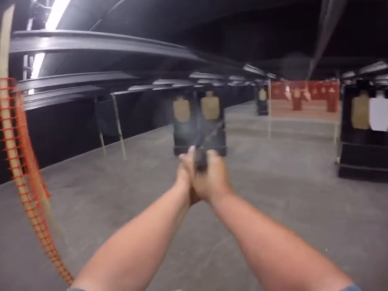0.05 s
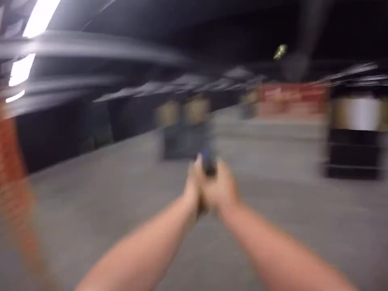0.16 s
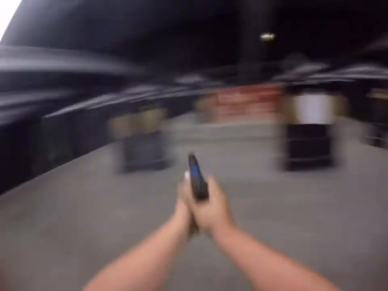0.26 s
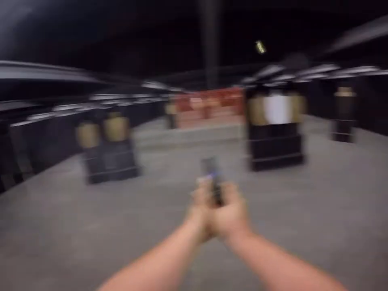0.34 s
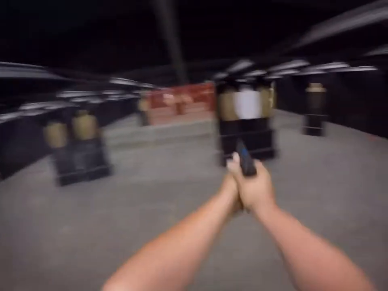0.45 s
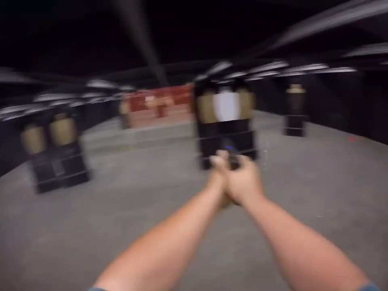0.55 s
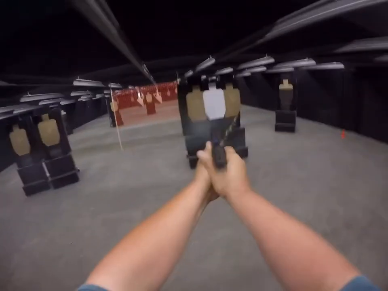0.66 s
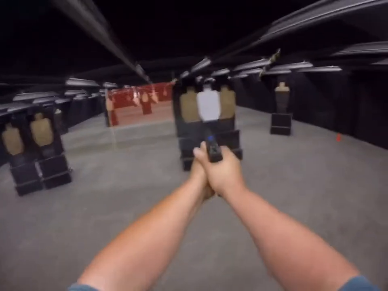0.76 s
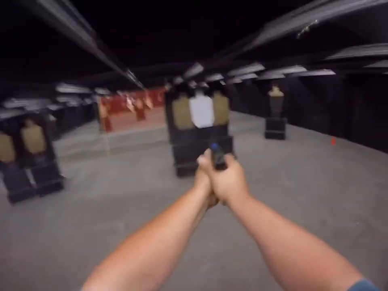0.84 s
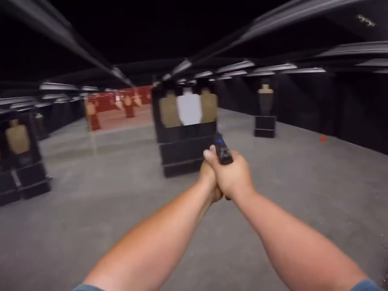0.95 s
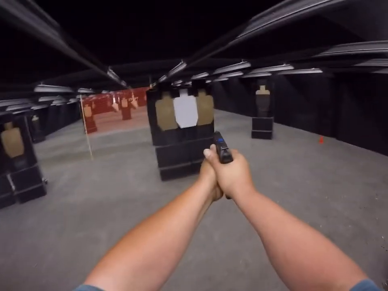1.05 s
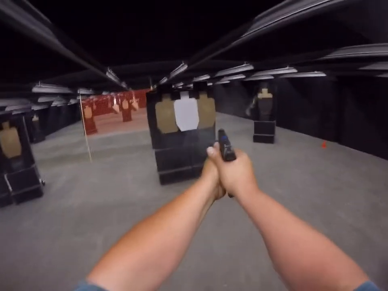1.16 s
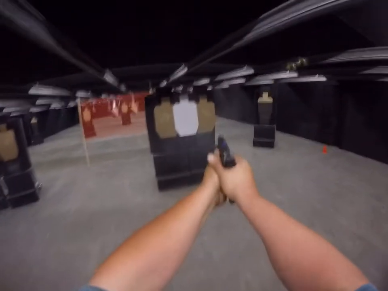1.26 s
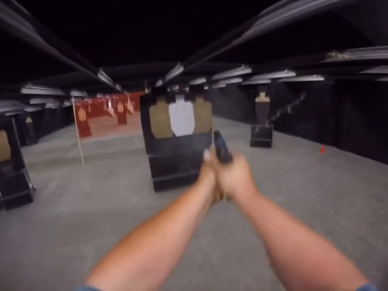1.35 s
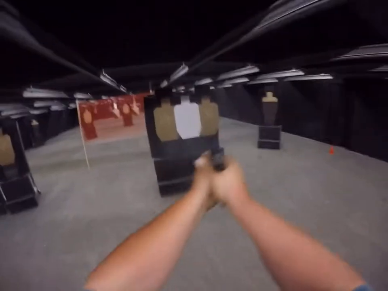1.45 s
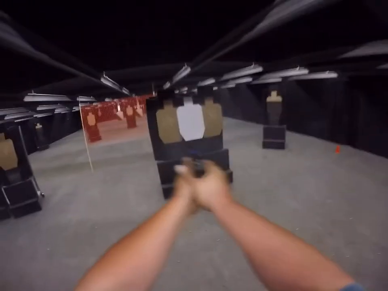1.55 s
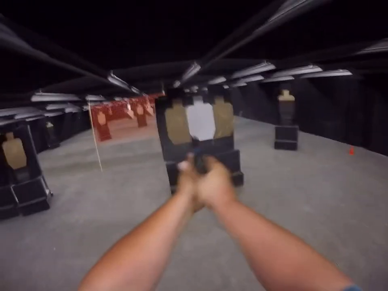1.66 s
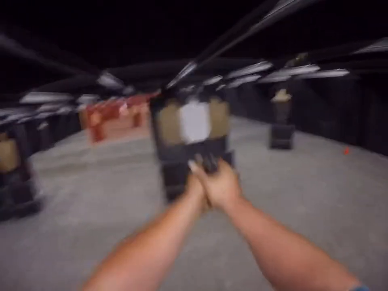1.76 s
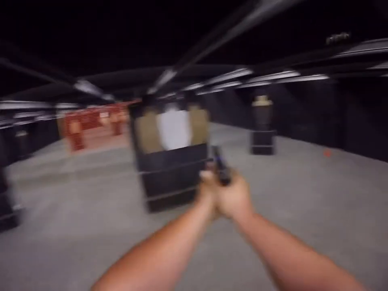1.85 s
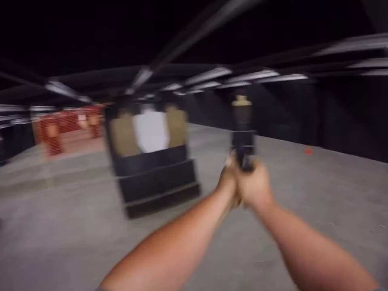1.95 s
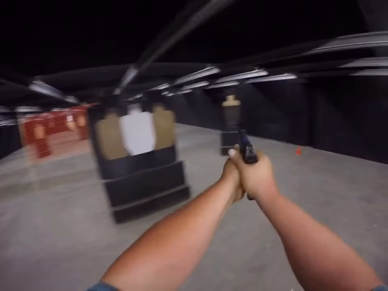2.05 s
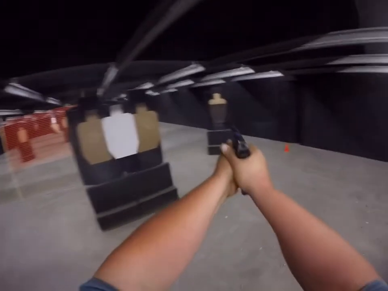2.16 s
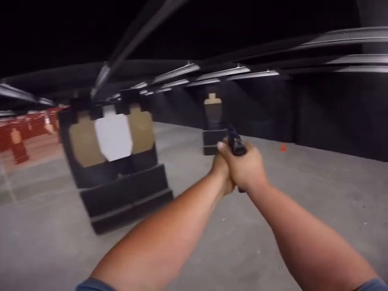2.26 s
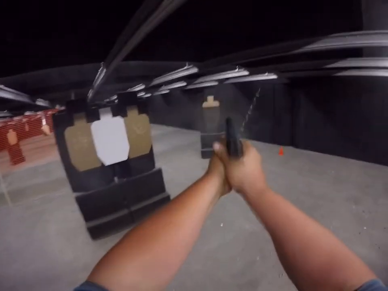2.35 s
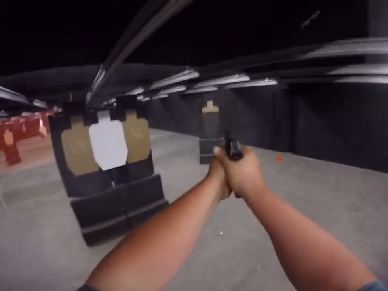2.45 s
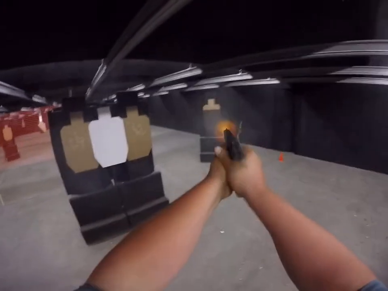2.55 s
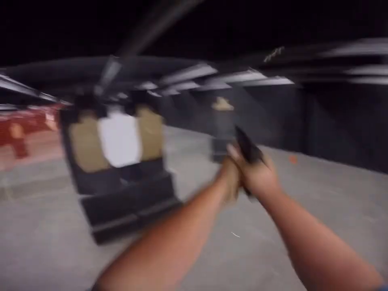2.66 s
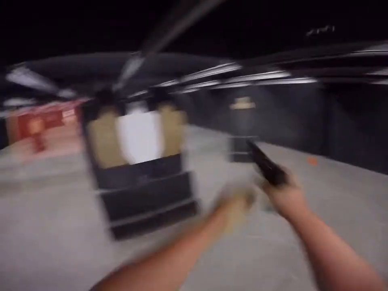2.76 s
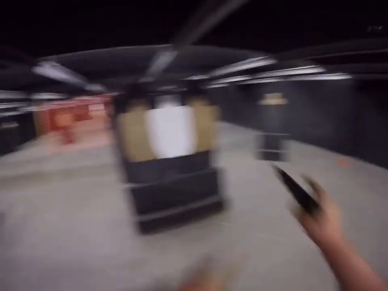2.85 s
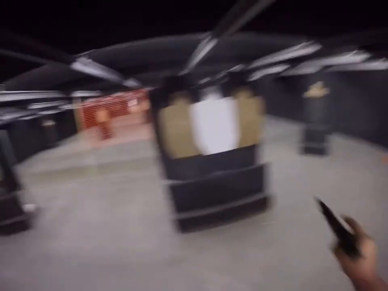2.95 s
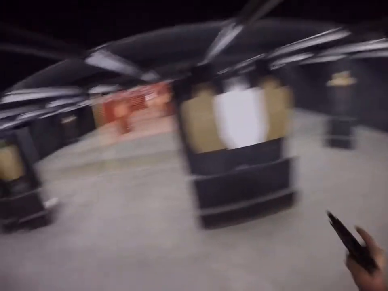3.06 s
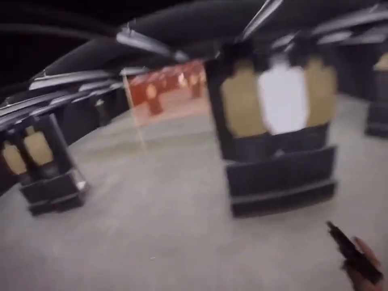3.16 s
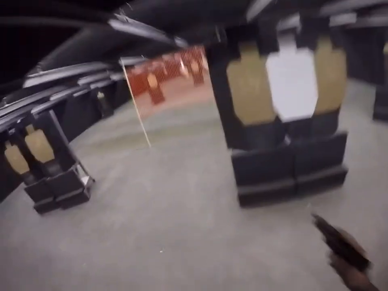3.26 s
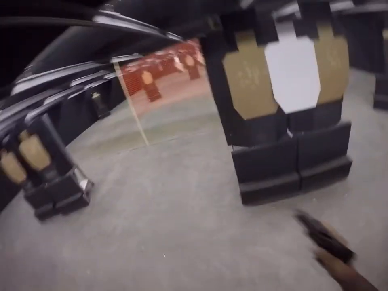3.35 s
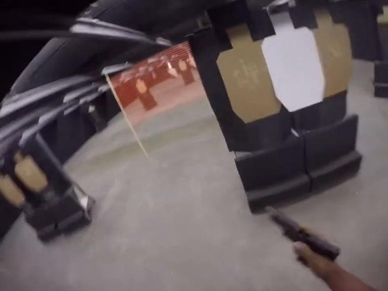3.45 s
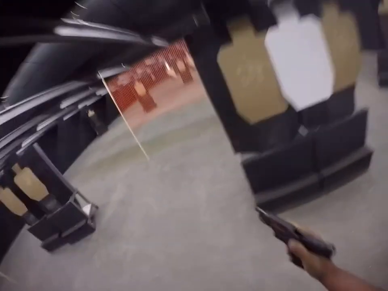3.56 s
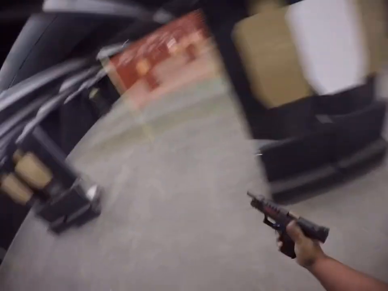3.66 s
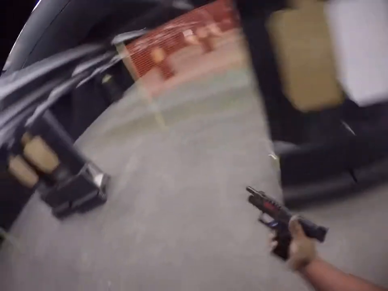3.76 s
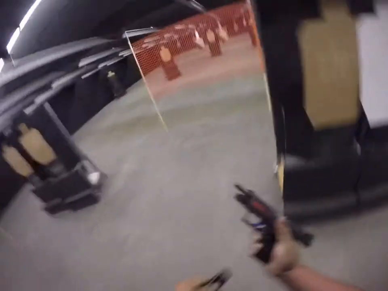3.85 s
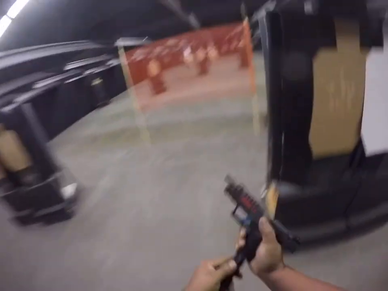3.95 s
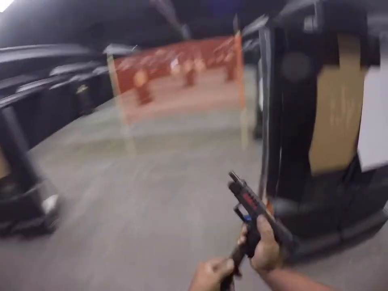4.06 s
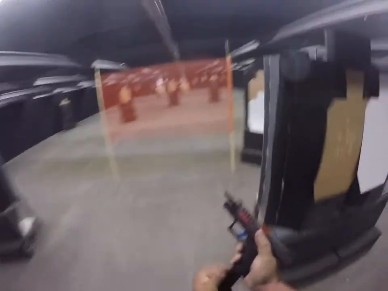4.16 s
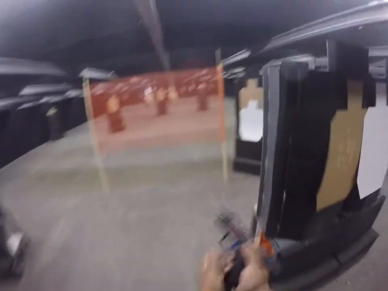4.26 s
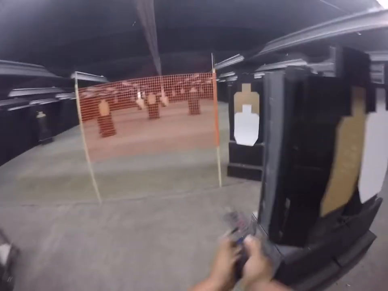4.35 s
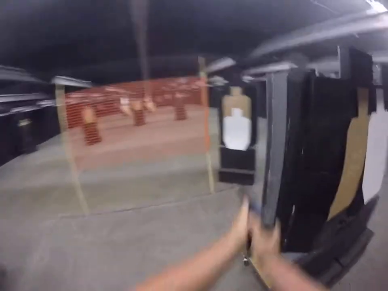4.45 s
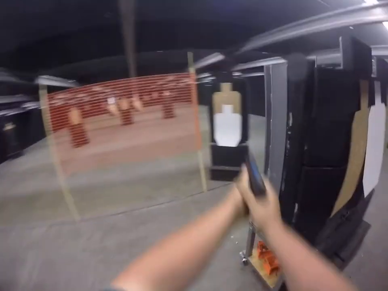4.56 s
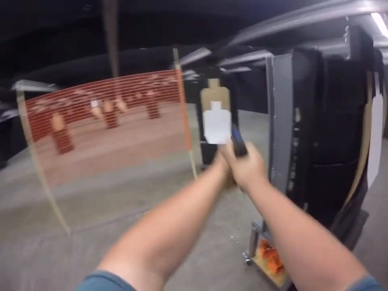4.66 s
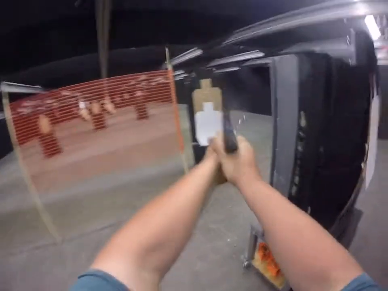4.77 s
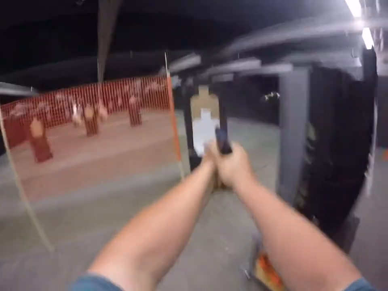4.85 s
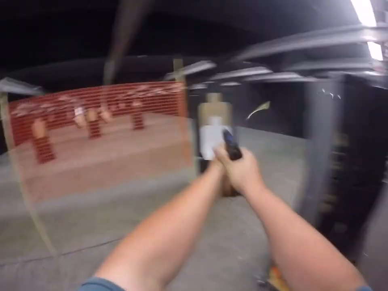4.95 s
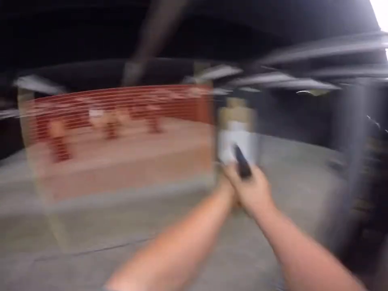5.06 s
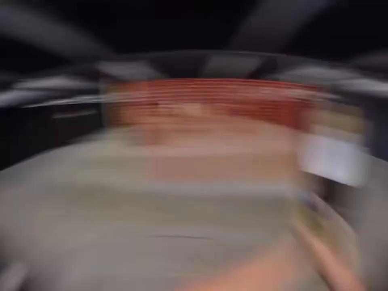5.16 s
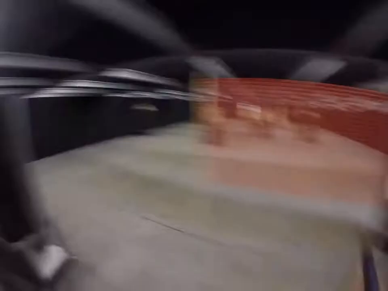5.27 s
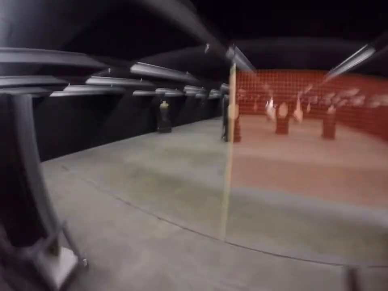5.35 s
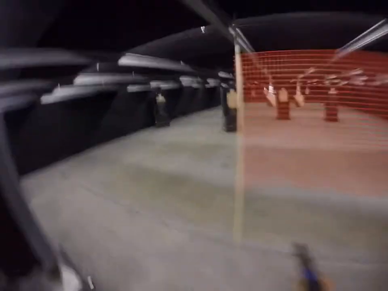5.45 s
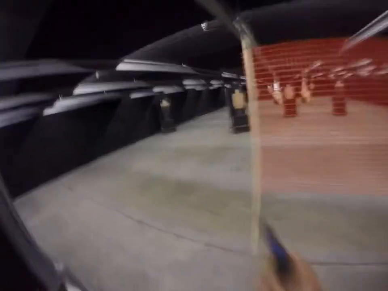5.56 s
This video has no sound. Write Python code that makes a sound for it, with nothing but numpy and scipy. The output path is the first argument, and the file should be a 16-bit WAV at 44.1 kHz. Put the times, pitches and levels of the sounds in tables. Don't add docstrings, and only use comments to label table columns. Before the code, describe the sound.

In a long, hard-walled indoor range, a handgun fires seven spaced shots, each a bright crack with a clipped boxy boom and rolling echo. Spent brass tinkles on the floor. A dropped magazine clatters, a fresh one snaps in, the slide slams, then two rapid shots follow. The sealed, head-worn microphone sounds muffled and overloaded.

```python
import sys
import numpy as np
from scipy import signal
from scipy.io import wavfile

SR = 44100
rng = np.random.default_rng(int(sys.argv[2]) if len(sys.argv) > 2 else 0)


def linear_from_db(decibels):
    return 10 ** (np.asarray(decibels, float) / 20)


def generate_wav(signal):
    frames = np.transpose(np.atleast_2d(signal))
    scaled = np.clip(frames, -1, 1) * 32767
    pcm = np.round(scaled).astype(np.int16)
    wavfile.write(sys.argv[1], SR, pcm)


N = 247401

# start [s], crack peak [dB], tail level [dB], tail length factor (shorter beside a barrier).
SHOTS = [
    (0.0756, 0.5, -9, 1.174),
    (0.7005, 0.5, -9.5, 1.18),
    (1.15, 4.5, -10.5, 1.1),
    (1.3365, -1.5, -10.5, 1.04),
    (1.6843, 2, -10, 1.193),
    (2.3551, 2, -8.5, 0.95),
    (2.593, 2.5, -11.5, 1.122),
    (4.7791, 7, -10, 1.106),
    (4.9426, 3.5, -13, 0.76),
]
# frequency [Hz], width [Hz], level [dB].
CASE_TREBLE = [(2770, 710, 3.5), (3840, 830, 2), (4960, 870, -2.5), (6660, 2300, -7.5), (10500, 10000, -11),
               (13500, 8900, -14)]


def rms_one(x):
    return x / np.sqrt(np.mean(x ** 2) + 1e-20)


def at_hz(points, hz):
    table_hz, values = np.transpose(points)
    return np.interp(np.log(hz), np.log(table_hz), values)


def band(x, low_hz, high_hz, order=2):
    sos = signal.butter(order, [low_hz, min(high_hz, .45 * SR)], "band", fs=SR, output="sos")
    return signal.sosfilt(sos, x + 1e-18)


def resonate(x, peaks):
    out = 0
    for k, (hz, width_hz, level_db) in enumerate(peaks):
        r = np.exp(-np.pi * width_hz / SR)
        poles = [1, -2 * r * np.cos(2 * np.pi * hz / SR), r * r]
        zeros = (1 - r * r) / 2 * np.array([1, 0, -1])
        out = out + (-1) ** k * linear_from_db(level_db) * signal.lfilter(zeros, poles, x + 1e-18)
    return out


def add(out, start_s, piece):
    i = max(round(start_s * SR), 0)
    out[i:i + len(piece)] += piece[:N - i]


def burst(t60_s, rise_s, grain_db):
    t = np.arange(int(.12 * SR)) / SR
    roughness = np.clip(rng.standard_normal(len(t)), -3, 1.6)
    grains = rng.standard_normal(len(t)) * linear_from_db(grain_db * roughness)
    x = grains * (1 - np.exp(-t / rise_s)) * linear_from_db(-60 * t / max(t60_s, .002))
    return x / np.abs(x).max()


def slow(rate_hz):
    r = np.exp(-2 * np.pi * rate_hz / SR)
    return rms_one(signal.lfilter([1], [1, -2 * r, r * r], rng.standard_normal(N + SR))[SR:])


def moving():
    # time [s], level [dB].
    stride_rows = [(3.2, -58.5), (3.39, -49.5), (3.45, -56), (3.7, -53), (3.9, -47), (4.05, -38.5),
                   (4.11, -44), (4.35, -39.5), (4.42, -44.5), (4.52, -37.5), (4.74, -39), (5.38, -50),
                   (5.43, -53), (5.5, -41), (5.6, -45.5)]
    # time [s], level [dB].
    hands_rows = [
        (3.41, -76.5),
        (3.52, -60),
        (3.659, -69.5),
        (3.8, -61),
        (4.02, -72),
        (4.14, -68),
        (4.28, -60),
        (4.4, -47),
        (4.76, -67),
        (5.3, -77),
    ]
    t = np.arange(N) / SR
    stride_db = np.interp(t, *np.transpose(stride_rows))
    hands_db = np.interp(t, *np.transpose(hands_rows))
    rustle_db = -58.5 + 0.69 * (stride_db + 49)

    lumps = rms_one(band(rng.standard_normal(N), 28, 86) * linear_from_db(2.7 * slow(10)))
    dull = band(band(rng.standard_normal(N), 110, 480, order=3), 60, 540, order=3)
    rubbing = rms_one(dull * linear_from_db(1.5 * slow(15)))
    grains = rng.standard_normal(N) * linear_from_db(4.3 * rng.standard_normal(N) + 3 * slow(35))
    fibres = rms_one(band(resonate(grains, CASE_TREBLE[:4]), 2000, 6900))
    return linear_from_db(stride_db) * lumps + linear_from_db(rustle_db) * rubbing + linear_from_db(hands_db) * fibres


def contact_rows():
    # bright edge [dB], body knock [dB], rattle t60 [s], hall level [dB].
    drop = [
        (3.3904, -24),
        (3.863, -39),
        (3.871, -36.5),
        (3.932, -44),
        (3.975, -45),
        (4.008, -57),
    ]
    drop_sound = (-11, -41, 0.2, -10.5)
    thud = [
        (3.698, -31),
        (4.1131, -35.5),
    ]
    thud_sound = (-15, -15, 0.13, -12)
    fumble = [(4.037, -45.5), (4.0445, -31.5), (4.0721, -38.5), (4.0855, -35), (4.156, -41), (4.165, -41),
              (4.1764, -33.5), (4.1864, -40), (4.198, -47), (4.232, -49.5), (4.306, -28)]
    fumble_sound = (-20.5, -21, 0.06, -29)
    trigger = [
        (2.317, -33.5),
        (2.335, -47),
    ]
    trigger_sound = (-38, -26.5, 0.1, -32.5)
    seat = [
        (4.3257, 0.5),
        (4.33, -17.5),
        (4.3335, -16),
    ]
    seat_sound = (-16, -29.5, 0.02, -29)
    slide = [
        (4.1174, -35.5),
        (4.399, -27),
        (4.410, -22),
        (4.418, -17.5),
        (4.4245, -12),
        (4.4268, -2),
        (4.432, -10.5),
    ]
    slide_sound = (-5.5, -22, 0.05, -26)
    gear = [
        (2.2149, -50),
        (3.309, -52),
        (4.2592, -40),
        (4.2734, -42),
        (4.748, -57.5),
        (5.5932, -43.5),
    ]
    gear_sound = (-9, -16, -1.9, -13)
    kinds = [(drop, drop_sound), (thud, thud_sound), (fumble, fumble_sound), (trigger, trigger_sound),
             (seat, seat_sound), (slide, slide_sound), (gear, gear_sound)]
    return [(*row, *sound) for rows, sound in kinds for row in rows]


def hall():
    # frequency [Hz], level [dB per Hz].
    tail_spectrum = [(20, -29.5), (45, -23.5), (80, -13), (155, -12), (250, -0.5), (410, 1), (560, -11),
                     (690, -16.5), (1450, -34), (2100, -30.5), (4000, -28), (6500, -36), (9000, -44.5),
                     (15000, -48)]
    # frequency [Hz], t60 [s].
    tail_t60 = [(40, 1), (110, 1.4), (200, 0.68), (350, 0.71), (1000, 0.6), (2000, 0.82), (4000, 0.68),
                (8000, 0.46), (14000, 0.31)]
    # frequency [Hz], level [dB per Hz].
    contact_spectrum = [(900, -30), (1400, -20.5), (2100, -10.5), (3200, -17.5), (3900, -2.5), (5200, -0.5),
                        (7000, -10.5), (9000, -11), (11500, -12), (15000, -15)]
    # frequency [Hz], level [dB per Hz].
    air_spectrum = [(350, -46), (600, -22), (2830, -5.5), (3200, -8.5), (5360, -6), (11200, -22),
                    (15500, -42.5)]
    # frequency [Hz],
    # width [Hz], level over the tail [dB], t60 [s].
    lingering = [(211.2, 34, 0.5, 1.04), (1124, 150, 5, 0.86), (2650, 470, 2, 0.67), (5210, 400, 0.5, 0.51)]
    # start [s], tail level [dB], tail length factor.
    earlier_shot = (-.33, -10, 1.17)
    # excess [dB], settling time [s].
    first_drop = (5.7, .06)
    # level [dB], t60 factor.
    far_end = (-15, 1.5)
    settle_db, settle_s = first_drop
    far_db, far_longer = far_end

    out, white = np.zeros(N), rng.standard_normal((3, N))
    edges_hz = 20 * 2 ** np.arange(0, 9.7, 1 / 3)
    bands = [(low, high, 0, at_hz(tail_t60, np.sqrt(low * high))) for low, high in zip(edges_hz, edges_hz[1:])]
    bands += [(hz - width_hz / 2, hz + width_hz / 2, db, t60_s) for hz, width_hz, db, t60_s in lingering]
    t = np.arange(SR * 3 // 2) / SR
    settle = 1 + linear_from_db(2 * settle_db) * np.exp(-t / settle_s * 3)
    tails = [earlier_shot] + [(s, tail_db, longer) for s, _, tail_db, longer in SHOTS]
    contacts = np.zeros(N)
    for s, peak_db, _, _, _, hall_db in contact_rows():
        add(contacts, s + 0.0017, linear_from_db(2 * np.array([peak_db + hall_db])))

    for k, (low_hz, high_hz, extra_db, t60_s) in enumerate(bands):
        hz = np.sqrt(low_hz * high_hz)
        air_db = -75.5 + at_hz(air_spectrum, hz)
        power = np.full(N, linear_from_db(2 * air_db) * (hz > 600))
        fill = 1 - np.exp(-(t / (0.00067 + 0.27 / hz)) ** 2)
        far_power = linear_from_db(2 * far_db) / (1 + (hz / 6500) ** 4)
        for s, tail_db, longer in tails:
            fade = np.exp(-6 * np.log(10) * t / (t60_s * longer))
            start_power = linear_from_db(2 * (tail_db + 17.5 + at_hz(tail_spectrum, hz)))
            dying = start_power * (fade + far_power * fade ** (1 / far_longer))
            add(power, s, (fill * settle * dying)[max(round(-s * SR), 0):])
        if hz > 900:
            click_t60_s = 0.95 * t60_s / (1 + (hz / 11500) ** 4)
            retained = linear_from_db(-120 / (click_t60_s * SR))
            ring = signal.lfilter([1], [1, -retained], contacts + 1e-18)
            power += linear_from_db(2 * (at_hz(contact_spectrum, hz) - 1.0)) * ring
        noise = band(white[2 if extra_db else k % 2], low_hz, high_hz)
        out += linear_from_db(extra_db) * np.sqrt(power) * noise
    return out


def casings():
    # time [s], peak level [dB], ring frequency [Hz].
    landings = [(0.5486, -55, 10770), (0.9674, -72, 10490), (1.074, -69, 10800), (1.9997, -71, 10300),
                (2.2198, -64, 11400), (2.9665, -64.5, 10500), (3.0286, -59, 11230), (3.1988, -70.5, 11440),
                (3.3079, -53, 10850), (3.468, -58, 10800), (3.4882, -65.5, 11330), (3.536, -59, 10800),
                (3.6236, -65, 11400), (3.8716, -51, 10860), (3.9255, -67, 10850), (4.115, -47.5, 11560),
                (4.1579, -50, 10700), (4.2597, -60.5, 11500), (4.3799, -55, 11400)]
    brass_decay_s = 0.46
    out, t = np.zeros(N), np.arange(SR // 2) / SR
    for s, peak_db, hz in landings:
        split, phase = rng.random(2)
        upper_mode = np.sin(2 * np.pi * ((hz + 60 + 200 * split) * t + phase))
        pair = np.sin(2 * np.pi * hz * t) + .4 * upper_mode
        add(out, s, linear_from_db(peak_db - 2.0 - 75 * t / brass_decay_s) * pair)
        landing_tick = band(burst(.012, .0002, grain_db=8), 5000, 15000)
        add(out, s, linear_from_db(peak_db + 7) * landing_tick)
    return out * (0.3 + 0.2 * slow(60))


def handling():
    # frequency [Hz], level [dB], ring length [s] (mode width is 32 Hz over it).
    steel_modes = [(2760, -10, 0.12), (4170, -9, 0.034), (4640, -2, 0.03), (5070, 0.5, 0.05),
                   (5410, -1, 0.065), (5520, -12.5, 0.047), (6365, -9.5, 0.091), (7470, -28.5, 0.16)]
    scrape_span_s = (4.398, 4.426)
    scrape_span_db = (-38, -25)
    out = np.zeros(N)
    for s, peak_db, top_db, knock_db, t60_s, _ in contact_rows():
        rattle = burst(t60_s, 0.00027, grain_db=5)
        rattle[:30] += 1.2 * np.hanning(30) * rng.standard_normal(30)
        steel = [(hz, 32.0 / ring_s, db + rng.normal(0, 3)) for hz, db, ring_s in steel_modes]
        body = linear_from_db(15.5) * resonate(rattle, steel) + resonate(rattle, CASE_TREBLE[:4])
        body = band(body + linear_from_db(-17) * band(rattle, 1300, 2900), 1900, 7200)
        edge = band(rattle, 7200, 19000)
        knock = band(band(rattle, 190, 600), 150, 800)
        piece = body / np.abs(body).max() + linear_from_db(top_db) * edge / np.abs(edge).max()
        piece = piece + linear_from_db(knock_db) * knock / np.abs(knock).max()
        add(out, s, linear_from_db(peak_db) * piece)

    n = int((scrape_span_s[1] - scrape_span_s[0]) * SR)
    scrape = rng.standard_normal(n) * linear_from_db(5 * rng.standard_normal(n))
    swell = linear_from_db(np.linspace(*scrape_span_db, n))
    add(out, scrape_span_s[0], swell * rms_one(resonate(scrape, CASE_TREBLE)))
    return out


def shots():
    # frequency [Hz], width [Hz], level [dB].
    case_boom = [(214, 82, 1.5), (306.6, 106, 2.5), (411.3, 117, -1), (1100, 100, -5.5)]
    echo_delays_s = [.0028, .0048, .0068, .009, .0119, .013, .017, .022, .025, .030, .04, .052]
    crack, push, shove = np.zeros((3, N))
    t = np.arange(SR // 100) / SR
    blast = (1 - t / 0.0015) * np.exp(-t / 0.00033)
    for s, crack_db, tail_db, _ in SHOTS:
        boom_db = 8.5 + 0.99 * crack_db
        shove_db = -13.5 + crack_db
        add(crack, s, linear_from_db(crack_db + 12.5) * burst(0.0031, 0.00082, grain_db=0.0))
        add(push, s + 0.00089, linear_from_db(boom_db) * blast)
        add(shove, s + 0.0013, linear_from_db(shove_db) * np.hanning(SR // 55))
        for delay_s in echo_delays_s:
            shift, louder = rng.standard_normal(2)
            echo_s = s + delay_s * (1 + .08 * shift)
            path_db = -5 - 403.5 * delay_s
            echo_db = path_db + tail_db + 11 + 2.5 * louder
            add(crack, echo_s, linear_from_db(crack_db + echo_db + 5.5) * burst(0.0085, 0.00019, grain_db=1.0))
            add(push, echo_s + 0.00091, linear_from_db(boom_db + echo_db - 5.5) * blast)
    boom = linear_from_db(13.5) * resonate(band(push, 25, 900, order=1), case_boom)
    return resonate(crack, CASE_TREBLE) + boom + band(shove, 12, 80, order=1)


def scene():
    return (moving() + hall() + casings() + handling() + shots())[None]


def band_limit(x):
    return signal.sosfilt(signal.butter(12, 16540, fs=SR, output="sos"), x)


def record(dry):
    # frequency [Hz], width [Hz], level of the part removed [dB].
    case_dips = [(3180, 950, -4), (2050, 600, -8.5), (8770, 690, -9.5)]
    # frequency [Hz], width [Hz], level added [dB].
    case_port = [(14000, 3600, -2)]
    for dip in case_dips:
        dry = dry - resonate(dry, [dip])
    dry = dry + resonate(dry, case_port)
    cut = signal.sosfilt(signal.cheby2(12, 40, 15750, fs=SR, output="sos"), dry)
    input_top, knee = .97, 5.6
    clipped = cut / (1 + np.abs(cut / input_top) ** knee) ** (1 / knee)
    mix = signal.sosfiltfilt(signal.butter(24, 16300, fs=SR, output="sos"), clipped)
    return band_limit(mix)


dry = scene()
out = record(dry)
generate_wav(out)
```